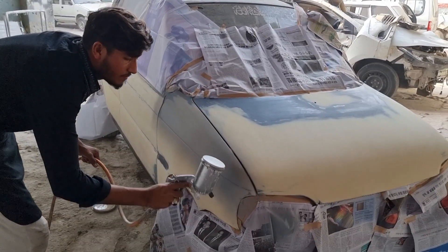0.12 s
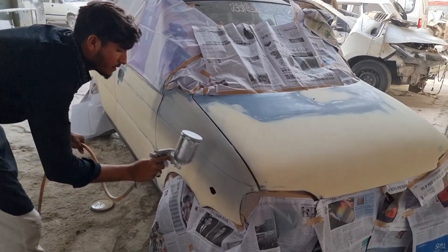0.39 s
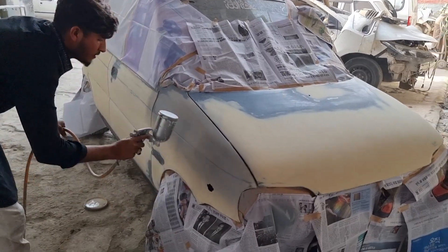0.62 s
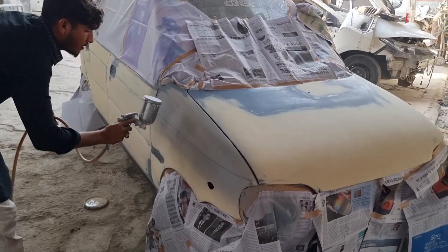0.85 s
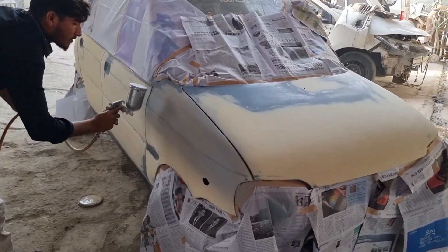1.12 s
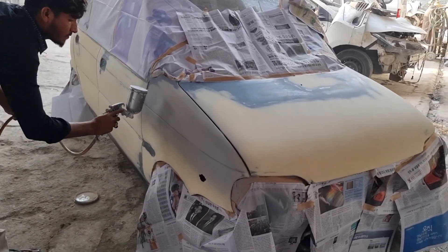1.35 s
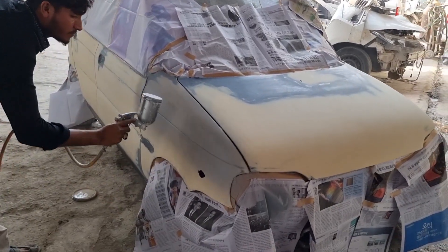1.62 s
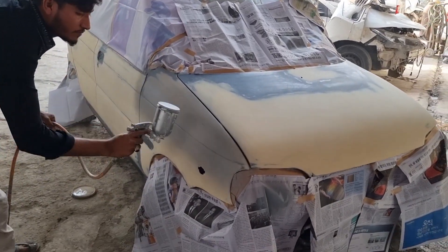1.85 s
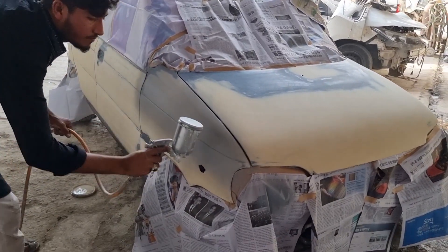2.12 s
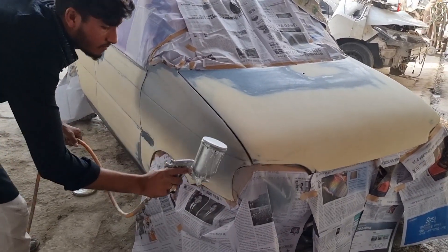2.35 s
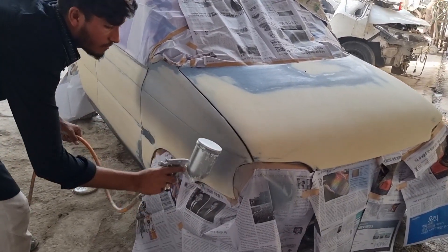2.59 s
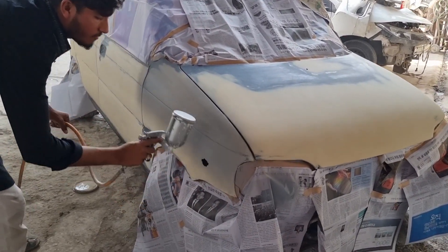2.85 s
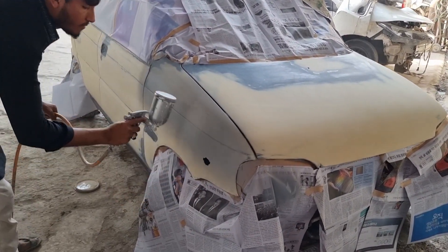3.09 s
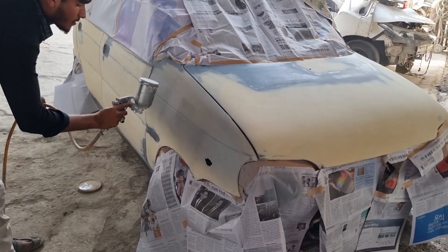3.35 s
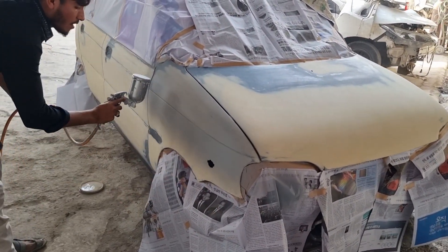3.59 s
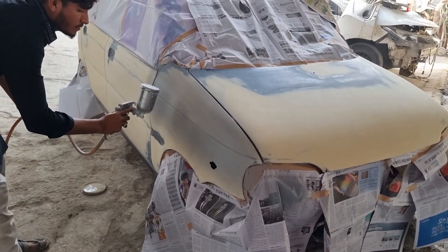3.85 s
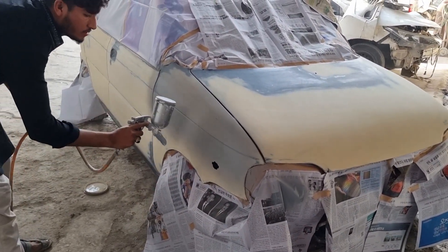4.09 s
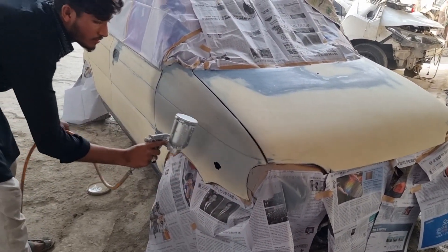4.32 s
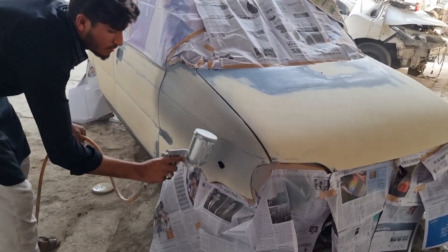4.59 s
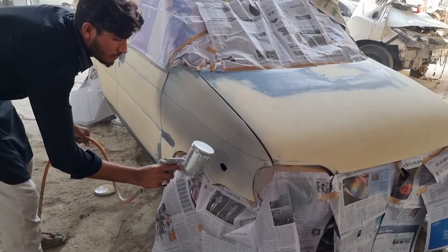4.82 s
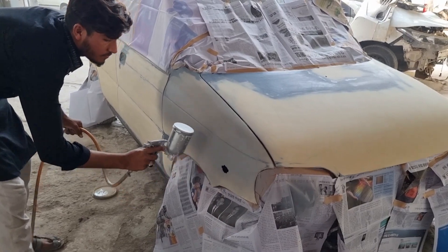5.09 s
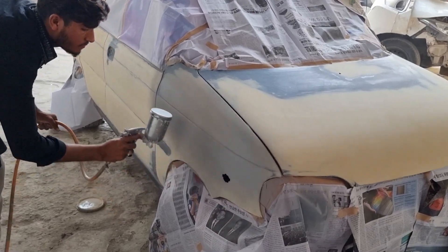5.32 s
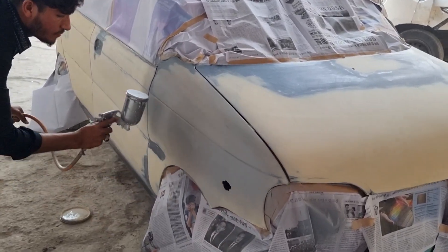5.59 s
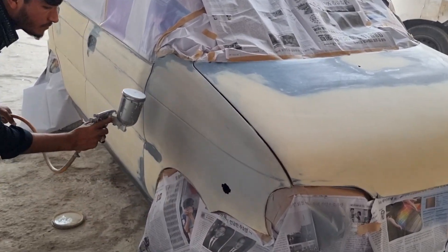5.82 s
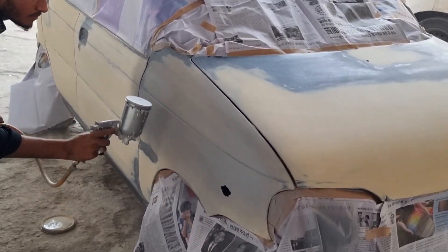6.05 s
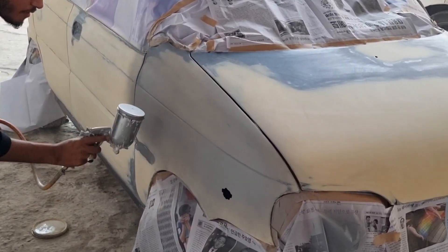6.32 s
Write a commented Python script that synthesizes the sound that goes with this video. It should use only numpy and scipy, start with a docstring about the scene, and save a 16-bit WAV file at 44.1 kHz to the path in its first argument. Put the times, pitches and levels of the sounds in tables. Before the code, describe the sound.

Continuous piercing air hiss from a spray gun near a car wing, close and dry in an open yard, heard on a hand-held stereo phone. Fine spray crackles smoothly on metal, with little low rumble. Small puffs come and go, the biggest cluster near three seconds; a barely audible wavering tone passes before that. After four seconds a palm shades the microphone, the sizzle drops and the stereo image shifts, with soft low bumps.

```python
"""Spray gun on a masked car wing

A compressed-air gun sweeps along a car wing masked with paper, two metres from a hand-held phone.
Coloured noise follows level curves: nozzle hiss, spray sizzle on steel, roar at wheel arch and paper.
Short swells of noise are gusts thrown back; a faint wavering sine sounds far off.
Decaying sines are thumps on the case; later a palm shades the right port and rubs there as low noise."""
import sys
import numpy as np
from scipy import signal
from scipy.fft import rfft, irfft, next_fast_len
from scipy.io import wavfile
from scipy.ndimage import uniform_filter1d, map_coordinates

SR = 44100
rng = np.random.default_rng(int(sys.argv[2]) if len(sys.argv) > 2 else 0)


def output_pcm(signal):
    """Save a mono or channel-first signal as 16-bit PCM at the path in sys.argv[1].

    Samples are clipped to [-1, 1] before scaling.
    """
    pcm = np.clip(np.atleast_2d(signal).T, -1, 1) * 32767
    wavfile.write(sys.argv[1], SR, np.round(pcm).astype(np.int16))


def voltage_ratio(decibels):
    """Convert decibels (scalar or array-like) to amplitude ratios, 20 dB per decade."""
    exponent = np.asarray(decibels, float) / 20
    return 10 ** exponent


N = 284004  # samples

# air cap hiss: (time [s], level [dB], left over right [dB], added to that of the ports)
NOZZLE_AIM = [(0, -27, -5.5), (.25, -28, -3), (.32, -27, -5), (.48, -28, -5), (.97, -33.5, -5.5),
              (1.99, -30, -2.5), (2.08, -30, -4.5), (2.39, -28, -4.5), (3.0, -27.5, -3.5),
              (3.57, -30.5, -3), (4.03, -29.5, -2.5), (4.23, -27, -1), (4.3, -32, 0), (4.45, -30, 0),
              (4.54, -34, 3), (4.72, -30, 1), (4.85, -33, 2), (5.6, -31, 0), (6.08, -30, -2),
              (6.2, -24.5, -1), (6.31, -29.5, -3), (6.44, -27, -2)]
# lower skirt of the hiss: (time [s], level [dB])
SKIRT_LEVEL_DB = [(0, -34), (.5, -33), (.97, -37.5), (2.0, -32.7), (3.0, -33.5), (3.6, -37.5), (4.3, -34.5),
                  (5.0, -33.5), (5.9, -32), (6.22, -29), (6.31, -32.5), (6.44, -30.5)]
# air cap singing near 14 kHz: (start [s], length [s], level [dB])
RING_SWELLS = [(.28, .22, -31), (4.36, .13, -35)]
RING_STEADY_DB = -46
# spray fan on the panel: (time [s], sizzle level [dB])
FAN_SIZZLE_DB = [(0.0, -37), (1.2, -37), (3.0, -36), (3.5, -37.5), (4.17, -36.5), (4.29, -42.67),
                 (4.5, -45.5), (4.82, -43.5), (5.76, -47.5), (6.15, -43.5), (6.44, -44.5)]
# mist: base level, share of the hiss swings, change under the palm, change with the phone turned
MIST_DB, MIST_FOLLOWS, MIST_PALM_DB, MIST_TURNED_DB = -44, 0.35, -3.5, 1.5

# gusts thrown back by edges and paper:
# (start [s], length [s], level [dB], centre [octaves above 1 kHz], spread to 6 dB down [octaves])
GUST_SWELLS = [(.18, .09, -40, -1.4, 1.5), (.267, .138, -39, .8, 1), (.362, .11, -37.5, -.07, .75),
               (1.03, .3, -44, -1.9, 1.2), (1.943, .21, -35.5, .5, 2.5), (2.05, .11, -39, -2.6, 1.1),
               (2.708, .07, -44, -.5, 4.5), (2.836, .06, -41, -3, 0.5), (2.838, .3, -35.5, 0.46, 2.5),
               (3.079, 0.1, -29.5, 0.4, 1.97), (3.173, .23, -36.5, .5, 1.6),
               (3.568, 0.18, -45.5, -1.3, 1.2), (4.17, .09, -41, 1.8, -0.2), (4.3, 0.16, -46.5, -2, 2.5),
               (4.488, .1, -44, -1.5, 1.8), (4.78, .1, -47.5, -0.8, 2), (4.966, 0.043, -40.5, 1.4, 3),
               (5.1, .22, -47, -2.2, 2.2), (5.574, .29, -47.5, -1.7, 1.3), (6.14, .17, -44.5, -2.2, 1.7),
               (6.255, .12, -36, 0.98, .85)]
# a swell rises in this share of its length, and has faded so much at its end
RISE_SHARE, FADE_DB, FADE_BEND = 0.24, 6.5, 1.68
# sizzle, rasp, scrub, grind, roar, flap, rumble: (place [octaves above 1 kHz], gain for gusts [dB])
GUST_LAYERS = [(2, 1), (1.57, 2.5), (0.93, -1.2), (0.03, -2.5), (-1.1, -0.34), (-2.5, -2), (-3.8, 1.5)]
# rasp to rumble between gusts:
# (base level [dB], change with the phone turned [dB], drift share [dB/dB], slow wander [dB])
STEADY_LAYERS = [(-43, -1.8, 1.1, .4), (-49.5, -3.5, 1.2, 0.74), (-51, -3, 0.9, 0.7), (-54, -1.5, 1, 0.7),
                 (-61.5, 6.5, 1, 1.5), (-56.5, 2.5, 0.7, 1.5)]
# slow drift of rasp to rumble between gusts: (time [s], change [dB])
RUSH_DRIFT_DB = [(0, 1), (.6, 0.05), (1.3, -1.5), (1.85, -1), (2.4, 1.5), (3.7, 0), (4.15, 1.5), (4.8, .5),
                 (5.4, -1), (6.44, 1)]

# noise colour of the nozzle hiss: (frequency [Hz], relative density [dB per Hz])
HISS_COLOUR = [(11500, -33), (12800, -8), (13600, 3.5), (15000, 9), (15800, 8), (16500, -11)]
# noise colour of the hiss skirt: (frequency [Hz], relative density [dB per Hz])
SKIRT_COLOUR = [(9500, -28.5), (11000, -9), (12000, -3.5), (12600, 0), (13300, -1.5), (15000, -10.5)]
# noise colour of spray on steel: (frequency [Hz], relative density [dB per Hz])
SIZZLE_COLOUR = [(3200, -13.5), (4200, -5), (5600, -4), (7000, -0.5), (7700, -1), (9000, -24.5)]
# noise colour of the mist: (frequency [Hz], relative density [dB per Hz])
MIST_COLOUR = [(7200, -31), (8200, -0.5), (10500, -0.5), (12500, -8)]
# noise colour of the upper edge rush: (frequency [Hz], relative density [dB per Hz])
RASP_COLOUR = [(1800, -15.5), (2750, 0), (3700, -2), (5500, -11.5)]
# noise colour of the lower edge rush: (frequency [Hz], relative density [dB per Hz])
SCRUB_COLOUR = [(1100, -22), (1600, 0), (2200, 0), (3100, -16)]
# noise colour of the upper paper rush: (frequency [Hz], relative density [dB per Hz])
GRIND_COLOUR = [(600, -14.5), (800, -5.5), (980, -4.5), (1180, 1), (1450, -3), (2000, -21)]
# noise colour of the lower paper rush: (frequency [Hz], relative density [dB per Hz])
ROAR_COLOUR = [(220, -17), (330, 1.5), (560, -0.5), (720, -5), (1000, -11)]
# noise colour of the flapping: (frequency [Hz], relative density [dB per Hz])
FLAP_COLOUR = [(90, -27), (150, 0.5), (280, 0.5), (420, -26)]
# noise colour of the rumble: (frequency [Hz], relative density [dB per Hz])
RUMBLE_COLOUR = [(25, -26), (42, -3), (54, -2), (120, 0), (190, -16.5)]
# noise colour of the palm rub: (frequency [Hz], relative density [dB per Hz])
PALM_COLOUR = [(35, -25), (62, 3), (200, -6), (450, -7.5), (800, -32)]

# ports, open grip: (frequency [Hz], likeness [0-1], left lead [rad], left over right [dB])
OPEN_PORTS = [(60, 1, -0.5, -1), (170, 1, -1.5, -1.5), (350, 0.36, 0.76, -4.5), (590, 0.1, 0.5, -2),
              (990, 0.37, 2.5, -2.5), (1800, 0.58, 3.5, -5), (2550, 0.37, 1.06, -4),
              (3370, 0.27, 2.5, -0.5), (5070, 0.68, 3, -2.5), (6530, 0.03, 4.5, -2.5),
              (7470, 0.32, 8, -3.5), (9000, 0.2, 10, -0.5), (10600, 0.3, 17.5, 2.5), (12700, 0, 22.5, -1.5),
              (15870, 0.1, 48, -0.5)]
# ports, palm near the right one: (frequency [Hz], likeness [0-1], left lead [rad], left over right [dB])
CUPPED_PORTS = [(60, 0.62, 1, -4.5), (344, 0.94, -0.5, -0.5), (900, 0.6, 1, -1.5), (1700, 0.44, 0.5, -3.5),
                (2650, 0.19, 3.1, 0), (3300, 0.78, 4, -0.5), (4400, 0.73, 7, 4.5), (5100, 0.48, 9.5, 11.5),
                (6030, 0.38, -5, 13.5), (7000, 0.28, 4.5, 9), (8500, 0.24, 3.5, 9.5), (9500, .4, 10, 6.5),
                (12200, 0.22, 13.5, -4.5), (13800, 0.43, 12, 4.5), (16000, .35, 12.5, -1)]
# both ports under the palm: (frequency [Hz], gain [dB])
PALM_SHADE = [(3500, 0.5), (4300, -3), (5200, -3), (5900, -5), (6800, -2), (7600, 0.5), (8500, -5),
              (9500, 0)]
# the grip: (time [s], palm cover [0-1], phone turned [0-1])
GRIP_SHIFT = [(0, 0.01, 0), (4.17, 0, 0), (4.3, 0.87, 0.04), (4.9, 1, 0.54), (5.0, 1, 0.88),
              (6.44, 0.92, 1)]
# touches on the case: (time [s], level before attack and decay [dB], frequency [Hz], left over right [dB])
CASE_THUMPS = [(0.229, -43, 150, -1), (2.737, -35, 202, -1.5), (2.864, -32.5, 143, -1),
               (4.214, -40, 194, -17), (4.359, -37, 59.7, -7.0), (4.419, -46, 51.1, -17),
               (4.54, -36, 170, -7), (4.809, -41, 164, -16), (5.599, -40, 237, -6.0),
               (5.749, -46, 56.5, -10), (6.238, -37, 223, -6)]
# palm on the right port: (time [s], level before wobble and port gains [dB])
PALM_RUB_DB = [(4.12, -76), (4.22, -47), (4.4, -49), (4.6, -60), (4.7, -52), (5.2, -56), (5.5, -56),
               (6.25, -55), (6.44, -60)]
# faint tone far off: (time [s], centre frequency [Hz], centre level [dB])
WHINE_TONE = [(1.0, 1110, -73), (1.3, 1173, -60), (1.6, 1200, -62), (1.78, 1295, -59), (1.92, 1130, -56),
              (2.0, 1200, -62)]


def unit(x):
    """Scaled to rms 1."""
    return x / np.sqrt(np.mean(x ** 2) + 1e-20)


def curves(rows, at=None):
    """Interpolates each later column over the first, at every sample time or at the given places."""
    place, *columns = np.transpose(rows)
    at = np.arange(N) / SR if at is None else at
    return [np.interp(at, place, column) for column in columns]


def wobble(knots_per_s):
    """A smooth random curve through normal knots."""
    knots = rng.standard_normal(int(N * knots_per_s / SR) + 4)
    return map_coordinates(knots, [np.arange(N) * knots_per_s / SR])


def rush(colour):
    """Turbulent air: two unrelated noises of one colour, rms 1."""
    size = next_fast_len(N + 8192)
    hz, db = np.transpose(colour)
    log_hz = np.log(np.fft.rfftfreq(size, 1 / SR) + 1)
    gain = voltage_ratio(np.interp(log_hz, np.log(hz), db, left=-120, right=-120))
    white = rfft(rng.standard_normal((2, N)), size)
    return unit(irfft(white * gain, size)[:, :N])


def sides(pan_db):
    """Left and right gains for a level difference."""
    return voltage_ratio(np.array([pan_db, -pan_db]) / 2)


def swells(rows):
    """Power of each swell over time: a quick rise, then an ever faster fade."""
    start_s, length_s, db = np.transpose(rows)[:3, :, None]
    age = np.clip(np.arange(N) / SR - start_s, 0, None) / length_s
    rise = 1 - np.exp(-age / RISE_SHARE)
    return (voltage_ratio(db - FADE_DB * age ** FADE_BEND) * rise) ** 2


def patches(shape, bins, frames):
    """A smoothed random field over frequency and time, rms 1."""
    field = uniform_filter1d(rng.standard_normal(shape), bins, -2)
    return unit(uniform_filter1d(field, frames, -1))


def ports(pair, streak_db, patchy_db):
    """The right port hears part of the left, shifted in phase; shifting echoes off the car streak the colour."""
    hz, t, (left, other) = signal.stft(pair, SR, nperseg=1024)
    cover, turned = curves(GRIP_SHIFT, t)
    like0, lead0, pan0 = np.array(curves(OPEN_PORTS, hz))[..., None]
    like1, lead1, pan1 = np.array(curves(CUPPED_PORTS, hz))[..., None]
    shared = (1 - turned) * like0 * np.exp(-1j * lead0) + turned * like1 * np.exp(-1j * lead1)
    # the gun moves, so the lag wanders
    sway_s = 4.5e-5 * np.interp(t, np.arange(N) / SR, wobble(2.5))
    shared = shared * np.exp(2j * np.pi * hz[:, None] * sway_s)
    own = np.sqrt(np.clip(1 - abs(shared) ** 2, 0, 1))
    z = np.array([left, shared * left + own * other])
    streaks = streak_db * patches(z.shape, bins=2, frames=30)
    colour_db = streaks + patchy_db * patches(z.shape, bins=12, frames=12)
    shade_db = cover * curves(PALM_SHADE, hz)[0][:, None]
    z = z * sides((1 - cover) * pan0 + cover * pan1) * voltage_ratio(colour_db + shade_db)
    return signal.istft(z, SR, nperseg=1024)[1][:, :N]


def nozzle():
    """Air leaves the cap at sound speed: a high hiss; its skirt and side follow the aim of the gun."""
    hiss_db, pan_db = curves(NOZZLE_AIM)
    skirt_db = curves(SKIRT_LEVEL_DB)[0]
    pulse_db = 0.42 * wobble(12) + 0.35 * wobble(40)  # hose pressure ripples
    jet = voltage_ratio(pulse_db) * (voltage_ratio(hiss_db) * rush(HISS_COLOUR) + voltage_ratio(skirt_db) * rush(SKIRT_COLOUR))
    ring_level = np.sqrt(voltage_ratio(RING_STEADY_DB) ** 2 + swells(RING_SWELLS).sum(0))
    ring = ring_level * rush([(13500, -22), (13950, 3), (14400, -17)])
    return ports(jet + ring, streak_db=1.0, patchy_db=1.6) * sides(pan_db)


def layer_levels(turned):
    """Amplitudes of sizzle to rumble: steady power plus gust power, strongest near each gust's centre."""
    drift_db = curves(RUSH_DRIFT_DB)[0]
    steady_db = curves(FAN_SIZZLE_DB)
    for db, turn_db, share, wander_db in STEADY_LAYERS:
        steady_db.append(db + turn_db * turned + share * drift_db + wander_db * wobble(3.04))
    centre, spread = np.transpose(GUST_SWELLS)[3:]
    reach = np.array([voltage_ratio(db - 6 * ((place - centre) / spread) ** 2) for place, db in GUST_LAYERS])
    return np.sqrt(voltage_ratio(np.array(steady_db)) ** 2 + reach ** 2 @ swells(GUST_SWELLS))


def spray():
    """The fan strikes steel, edges and paper, each a coloured rush; the paper shakes all but the low ones together."""
    cover, turned = curves(GRIP_SHIFT)
    hiss_db = curves(NOZZLE_AIM)[0]
    swing_db = hiss_db - hiss_db.mean()
    mist_db = MIST_DB + MIST_FOLLOWS * swing_db + MIST_PALM_DB * cover + MIST_TURNED_DB * turned
    sizzle, rasp, scrub, grind, roar, flap, rumble = layer_levels(turned)
    shake = wobble(30) + 0.71 * wobble(70)
    fan = voltage_ratio(0.38 * shake) * (sizzle * rush(SIZZLE_COLOUR) + voltage_ratio(mist_db) * rush(MIST_COLOUR))
    edges = voltage_ratio(0.24 * shake) * rasp * rush(RASP_COLOUR)
    edges = edges + voltage_ratio(0.26 * shake) * scrub * rush(SCRUB_COLOUR)
    paper = voltage_ratio(0.63 * shake) * (grind * rush(GRIND_COLOUR) + roar * rush(ROAR_COLOUR))
    low = voltage_ratio(1.5 * wobble(30)) * flap * rush(FLAP_COLOUR) + rumble * rush(RUMBLE_COLOUR)
    return fan + edges + paper + low


def handling():
    """Each touch pushes the case: a dull knock of about two cycles; the palm rubs lumpily at the right port."""
    knocks = np.zeros((2, N + SR))
    t = np.arange(SR // 8) / SR
    for start_s, db, hz, pan_db in CASE_THUMPS:
        attack = 1 - np.exp(-t / 0.00081)
        knock = np.sin(2 * np.pi * hz * t) * np.exp(-t * hz / 1.85) * attack
        start = round(start_s * SR)
        knocks[:, start:start + len(t)] += voltage_ratio(db) * sides(pan_db)[:, None] * knock
    rub_db = curves(PALM_RUB_DB)[0] + 3.1 * wobble(28)
    rub = voltage_ratio(rub_db) * rush(PALM_COLOUR) * voltage_ratio([[-14], [1.5]])  # left, right [dB]
    return knocks[:, :N] + rub


def far_whine():
    """A thin sine of wavering pitch and level that swells and fades."""
    hz, db = curves(WHINE_TONE)
    t = np.arange(N) / SR
    from_ends_s = np.minimum(t - WHINE_TONE[0][0], WHINE_TONE[-1][0] - t)
    swell = np.clip(from_ends_s / 0.08, 0, 1)
    level = voltage_ratio(db + 1.5 * wobble(13.0)) * np.sqrt(2)
    phase = 2 * np.pi * np.cumsum(hz + 12 * wobble(22)) / SR
    return swell * level * np.sin(phase)


def scene():
    """Gun, panel and far tone through the ports, plus the hand on the case."""
    panel = ports(spray() + far_whine(), streak_db=1.42, patchy_db=1.1)
    return nozzle() + panel + handling()


def roll_off(x):
    """The treble ends steeply here."""
    return signal.sosfilt(signal.butter(12, 17080, fs=SR, output="sos"), x)


def record(dry):
    """The phone keeps nothing above its band limit."""
    top_hz = 15755
    size = next_fast_len(N + 8192)
    passed = np.fft.rfftfreq(size, 1 / SR) < top_hz
    kept = irfft(rfft(dry, size) * passed, size)[:, :N]
    return roll_off(kept)


dry = scene()
out = record(dry)
output_pcm(out)
```